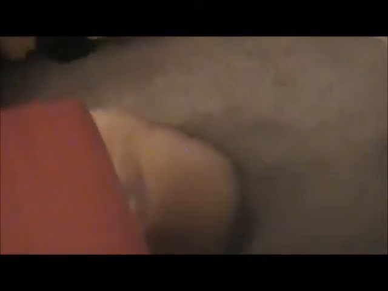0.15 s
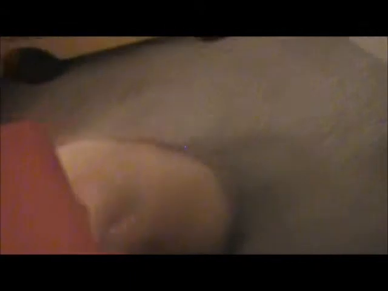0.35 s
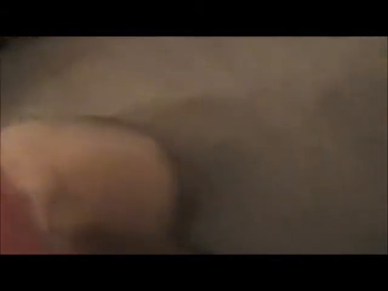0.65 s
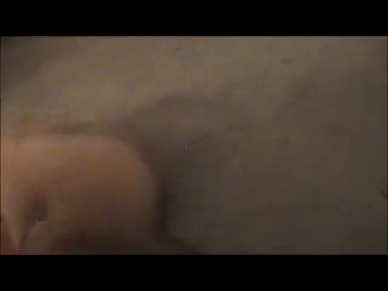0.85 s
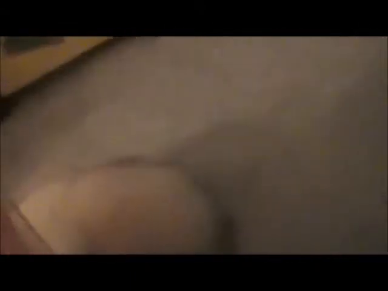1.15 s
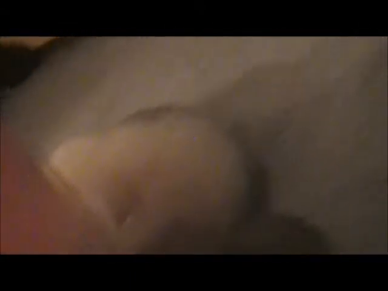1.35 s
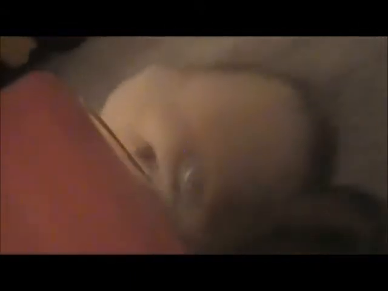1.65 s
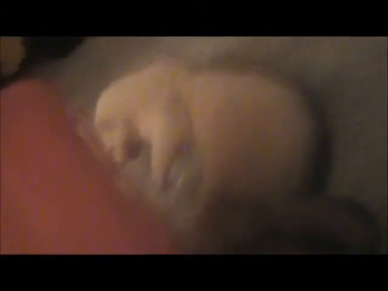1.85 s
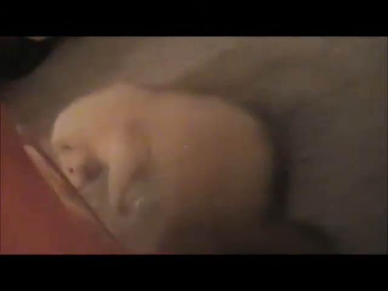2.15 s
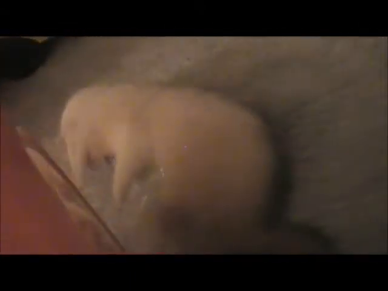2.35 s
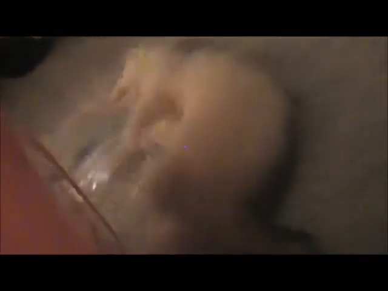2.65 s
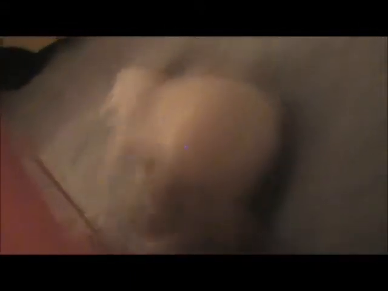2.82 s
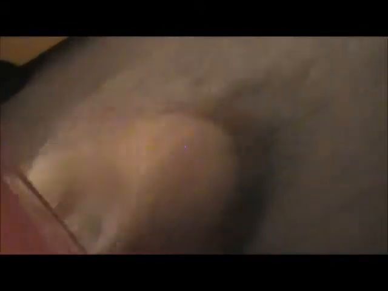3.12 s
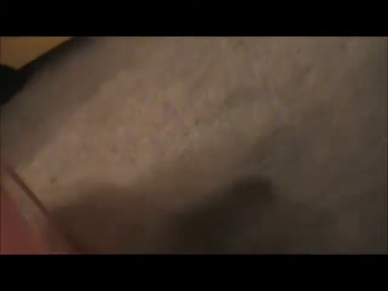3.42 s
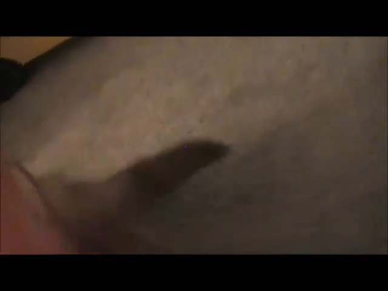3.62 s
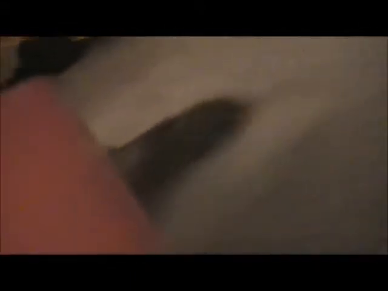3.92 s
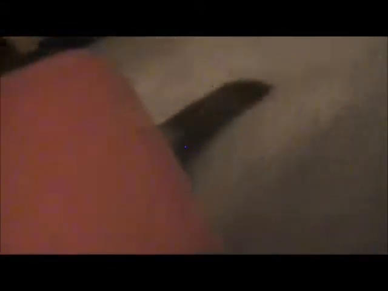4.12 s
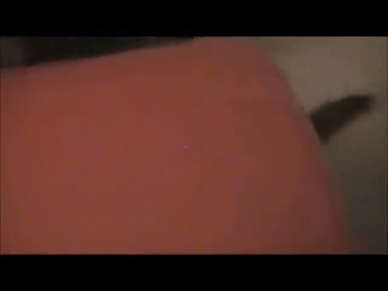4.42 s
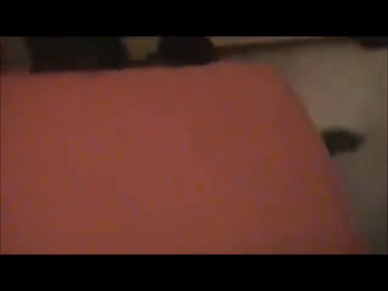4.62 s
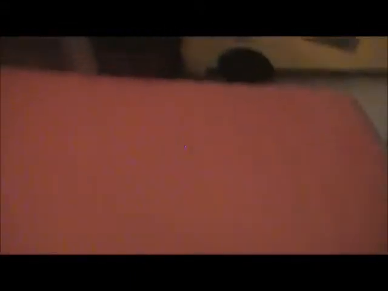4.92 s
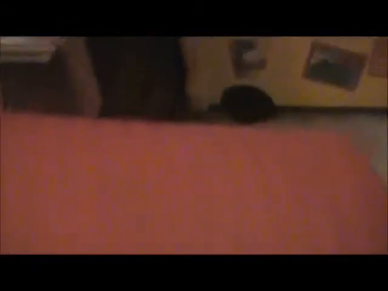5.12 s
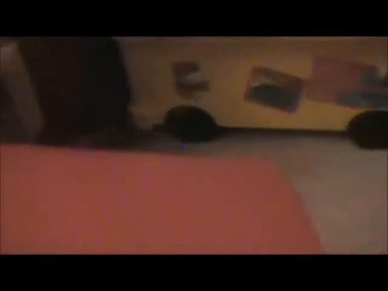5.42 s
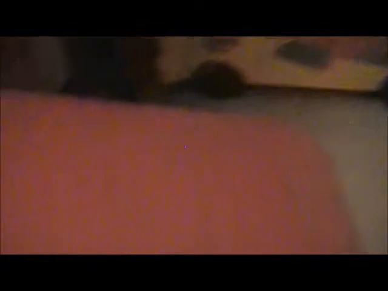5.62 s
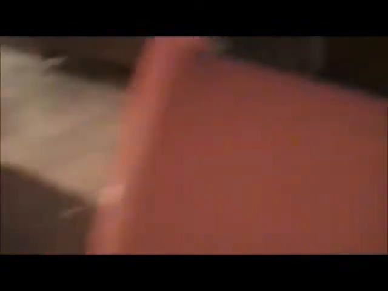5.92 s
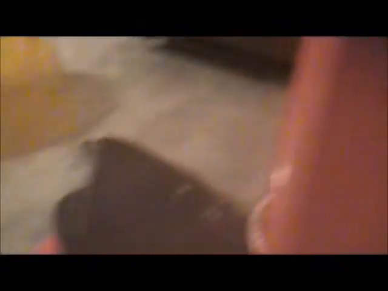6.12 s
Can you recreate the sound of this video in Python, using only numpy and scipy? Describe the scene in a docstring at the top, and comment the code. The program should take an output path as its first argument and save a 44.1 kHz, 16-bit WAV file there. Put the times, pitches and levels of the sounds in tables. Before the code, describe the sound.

Empty plastic bottles snap, crackle and knock against a plastic tub as a small ferret shoves them over carpet in a small room.

```python
"""A small carpeted room: a ferret shoves empty plastic bottles about, beside a plastic tub and close to a camera.
Noise bursts shaped by spectra make the thin walls snap, crumple and scrape and the bottles knock; decaying sines
ring the dented facets, struck panels and tub, and hoot as the air swings in a bottle's neck.
Shaped noise rubs fur and plastic on the carpet; a noise tail answers as the room, over a faint hum and hiss."""
import sys
import numpy as np
from scipy import signal
from scipy.fft import rfft, irfft, next_fast_len
from scipy.io import wavfile
from scipy.ndimage import uniform_filter1d

SR = 44100
rng = np.random.default_rng(int(sys.argv[2]) if len(sys.argv) > 2 else 0)


def store_wav(level_fs):
    """Save 16-bit WAV to argv[1]."""
    pcm = np.round(np.clip(np.atleast_2d(level_fs), -1, 1) * 32767)
    wavfile.write(sys.argv[1], SR, pcm.T.astype(np.int16))


N = 276543
TIME_S = np.arange(N) / SR


def amp(db):
    """Decibels to gain."""
    return 10 ** (np.asarray(db) / 20)


def unit(x):
    """Scales each channel to rms 1."""
    return x / np.sqrt(np.mean(x ** 2, axis=-1, keepdims=True) + 1e-20)


def read(points, hz):
    """Reads (f/Hz, value) points on a log-frequency axis."""
    f, value = np.transpose(points)
    return np.interp(np.log(hz + 1), np.log(f), value)


def add(mix, start_s, sound):
    """Mixes a sound in at start_s, cut off at the end of the mix."""
    part = mix[..., max(round(start_s * SR), 0):][..., :sound.shape[-1]]
    part += sound[..., :part.shape[-1]]


def response(points, size=2048):
    """The causal (minimum-phase) impulse response of a given spectrum."""
    log_gain = np.log(amp(read(points, abs(np.fft.fftfreq(size, 1 / SR)))))
    spectrum = np.exp(np.conj(signal.hilbert(log_gain)))
    return np.fft.ifft(spectrum).real[None, :size // 2]


def noise(points):
    """Mid and side noise of a given spectrum, rms 1."""
    size = next_fast_len(N)
    white = rfft(rng.standard_normal((2, size)))
    gain = amp(read(points, np.fft.rfftfreq(size, 1 / SR)))
    return unit(irfft(white * gain, size)[:, :N])


def waver(size, order):
    """Smooth random curve of rms 1 that changes over about order samples."""
    smooth = uniform_filter1d(rng.standard_normal(size), order)
    return unit(uniform_filter1d(smooth, order))


def radiate(force, responses, levels_db, length_s):
    """A force drives each range of the plastic; a range carries the energy of its level held for length_s."""
    parts = (amp(db) * unit(signal.fftconvolve(force, h, axes=1)) for h, db in zip(responses, levels_db))
    return sum(parts) * np.sqrt(length_s * SR / (force.shape[1] + responses[0].shape[1] - 1))


# radiation of a buckling wall, three ranges: f/Hz, relative level/dB
CRACK_SPECTRUM = [(3000, -49), (5000, -9.5), (6300, -3.5), (7900, 2.5), (9400, -0.5), (11000, -9),
                  (13500, -15.5), (16000, -23.5)]
FLEX_SPECTRUM = [(1000, -59.5), (1800, -13.5), (2300, 1), (2900, 0), (3700, 1.5), (5000, -5.5), (7000, -8),
                 (12000, -58.5)]
BODY_SPECTRUM = [(40, -10.5), (150, -10.5), (330, -10), (550, -6.5), (900, -3), (1600, -1), (2300, -17),
                 (5000, -32.5)]


def wall_responses():
    """The wall filters its force into a crack, a flex and a body range."""
    return [response(p) for p in (CRACK_SPECTRUM, FLEX_SPECTRUM, BODY_SPECTRUM)]


BODY_DB, BODY_DB_PER_FLEX_DB = -3.5, 1.14  # re crack at 0 dB of flex


def dent_levels(crack_db, flex_db):
    """Crack, flex and body levels: a bigger dent moves more of the bottle."""
    return crack_db + np.array([0, flex_db, BODY_DB + BODY_DB_PER_FLEX_DB * flex_db])


SNAP_RING_S, RING_DB_PER_FLEX_DB = 0.00404, 0.1  # a bigger dent rings longer
HARD_SNAP_DB, RING_DB_PER_EXCESS_DB = -20.5, 0.39  # a snap above this level is over sooner
# wall buckles: t/s, crack level/dB, dent size as flex level/dB re crack, facet f/Hz
WALL_SNAPS = [(0.0617, -17, -3.5, 2190), (0.0986, -19, -9, 4840), (0.1208, -9.5, -7.5, 2320),
              (0.3268, -35.5, 0.5, 2420), (0.4742, -32.5, -5.5, 1300), (0.5615, -11, -14, 4340),
              (0.68, -40.5, 12, 2550), (0.6992, -12, -4.5, 3750), (0.844, -11.5, -4.5, 2930),
              (0.897, -14.5, -9, 3200), (0.9383, -12, -9.5, 1300), (1.0308, -28.5, 4, 1250),
              (1.127, -33, -4, 900), (1.3546, -11, -12.5, 1040), (1.3665, -22, -1.5, 910),
              (1.516, -37.5, 1, 3560), (1.6351, -37.5, -2, 900), (2.389, -25.5, 0.5, 4070),
              (2.4205, -18.5, -4, 3200), (2.458, -23, -6, 4300), (2.541, -36, -6, 1510),
              (2.707, -29.5, -7, 790), (2.7358, -32, -7, 800), (2.756, -24, -14, 2600),
              (2.7626, -17.5, -7, 4800), (2.781, -15.5, -11.5, 4760), (2.818, -18, -12.5, 4800),
              (2.8215, -15.5, -12.5, 4830), (2.8561, -36, -3, 4860), (2.9718, -31, -8.5, 4800),
              (2.979, -32.5, -14, 4800), (3.679, -35.5, -1.5, 2830), (3.7911, -19.5, -8.5, 2300),
              (3.917, -16.5, -0.5, 2250), (4.2701, -19.5, -0.5, 3460), (4.293, -24.5, 0, 885),
              (4.3466, -19.5, -5.5, 3030), (4.398, -18, 1, 4520), (4.5347, -26.5, -3, 810),
              (4.8475, -29.5, 0, 1360), (4.9211, -17, -1, 3200), (5.027, -21.5, -5.5, 4530),
              (5.202, -23, 2.5, 1920), (5.247, -24.5, -6.5, 800), (5.2946, -29, 1, 980),
              (5.8628, -32, -6.5, 2150), (5.894, -33, -10, 1800), (5.9934, -31.5, -3.5, 2400),
              (6.0803, -22.5, -3, 900), (6.101, -23, 4.5, 1090), (6.2359, -25, -7, 2700)]


def snaps(rows, first=1.7, jump_s=0.00039, size=1200):
    """A dent pops through in a sharp jump, and the wave rattles round the thin wall for a few milliseconds."""
    out, t = np.zeros((2, N)), np.arange(size) / SR
    wall = wall_responses()
    for start_s, crack_db, flex_db, *_ in rows:
        excess_db = max(crack_db - HARD_SNAP_DB, 0)
        ring_s = SNAP_RING_S * amp(RING_DB_PER_FLEX_DB * flex_db - RING_DB_PER_EXCESS_DB * excess_db)
        rebound_s = ring_s * rng.uniform(0.48, 1)
        rebound = np.exp(-((t - rebound_s) / jump_s) ** 2)  # the rim of the dent follows
        force = rng.standard_normal((2, size)) * (np.exp(-t / ring_s) + 0.6 * rebound)
        force[0, 0] += first
        add(out, start_s, radiate(force, wall, dent_levels(crack_db, flex_db), 0.0018))
    return out


def facets(level_db=3.0, spread=0.043, t60_s=0.019, count=3):
    """Every dent leaves a facet of wall that rings briefly in a few close modes round its own pitch."""
    out, t = np.zeros((2, N)), np.arange(SR // 12) / SR
    for start_s, crack_db, flex_db, facet_hz in WALL_SNAPS:
        hz = facet_hz * (1 + spread * rng.uniform(-1.07, 1, (count, 1)))
        modes = np.sin(2 * np.pi * hz * t).sum(0) / count
        add(out[0], start_s, amp(level_db + crack_db + flex_db - 60 * t / t60_s) * modes)
    return out


TAUT_S = 0.121  # the hardest snap
# close modes of a taut wall: f/Hz, relative level/dB
TAUT_SPECTRUM = [(900, -46), (1500, -13), (2000, 3), (2400, 2.5), (2700, 0), (3200, -17), (4500, -39)]


def taut_wall(level_db=-23.5, t60_s=0.24):
    """The hardest snap leaves a taut wall singing on; fading band noise stands for its many close modes."""
    out, t = np.zeros((2, N)), np.arange(SR // 3) / SR
    add(out, TAUT_S, noise(TAUT_SPECTRUM)[:, :len(t)] * amp(level_db - 60 * t / t60_s))
    return out


# folds of a wall, and a few soft rustles and scrapes:
# middle t/s, half length/s, crack level/dB, flex level/dB re crack
WALL_CRUMPLES_AND_SCRAPES = [(0.005, 0.0057, -35.5, 3), (0.44, 0.097, -61, 5.5), (2.403, 0.014, -39, -6),
                             (2.565, 0.019, -44.5, -3), (2.783, 0.015, -31, -1), (2.821, 0.0073, -23, -8.5),
                             (3.603, 0.051, -50, 7), (3.934, 0.0093, -31.5, 0), (4.088, 0.064, -64.5, 13.5),
                             (4.438, 0.013, -44.5, 4.5), (4.971, 0.054, -38, 0), (5.22, 0.01, -34, 2),
                             (5.938, 0.012, -30.5, 1.5), (6.118, 0.011, -23.5, -6),
                             (6.247, 0.0098, -31.5, -2.5)]


def crumples(creases_per_s=1300):
    """A run of tiny random jolts over a weaker rustle, swelling and fading as the wall folds or scrapes."""
    out = np.zeros((2, N))
    wall = wall_responses()
    t = np.arange(-SR // 8, SR // 8) / SR
    for middle_s, half_s, crack_db, flex_db in WALL_CRUMPLES_AND_SCRAPES:
        creases = rng.random(len(t)) < creases_per_s / SR
        swell = np.exp(-.5 * (t / half_s) ** 2)
        force = rng.standard_normal((2, len(t))) * (creases + 0.21) * swell
        audible = force[:, middle_s + t >= 0]
        add(out, middle_s + t[0], radiate(audible, wall, dent_levels(crack_db, flex_db), 2 * half_s))
    return out


KNOCK_RING_S, RING_DB_PER_HARDNESS_DB = 0.0072, 0.07  # a hard contact is shorter
CLACK_DB, CLACK_DB_PER_HARDNESS_DB = -3, 1.31
# radiation of a knock, three ranges: f/Hz, relative level/dB
THUD_SPECTRUM = [(40, -54), (130, -7), (260, 2.5), (400, -2.5), (560, 1), (800, -18.5), (2000, -34.5)]
HOLLOW_SPECTRUM = [(300, -33.5), (600, -2), (780, -1), (1150, -7), (1600, -11.5), (4000, -50)]
CLACK_SPECTRUM = [(700, -60.5), (1300, -8), (1600, 5.5), (2200, 0), (3200, -18), (5000, -29), (10000, -33),
                  (16000, -72)]
# a bottle bumps the tub or the floor: t/s, base level/dB, hardness/dB, struck panel f/Hz
BOTTLE_KNOCKS = [(0.061, -27.5, -2.5, 574), (0.446, -34, -4, 416), (0.545, -36, 2, 450),
                 (0.68, -40.5, 13.5, 810), (0.893, -29, -1.5, 545), (0.933, -52.5, 22.5, 795),
                 (1.182, -31, -7.5, 465), (1.267, -33, -33, 483), (1.283, -37, -19, 490),
                 (1.306, -39, -17, 490), (1.5955, -37.5, 5, 926), (2.571, -37, 3.5, 282),
                 (2.702, -32.5, -4, 780), (2.738, -29.5, -17, 410), (2.779, -24.5, -38, 308),
                 (2.926, -40.5, -29, 363), (3.486, -36, -18, 302), (3.522, -33.5, 5, 882),
                 (3.546, -30.5, -6, 930), (3.785, -29.5, -3, 724), (3.863, -34, -7.5, 575),
                 (3.92, -30, -23, 276), (4.295, -28.5, -7.5, 845), (4.621, -23, -11, 375),
                 (4.632, -26.5, -3.5, 360), (4.745, -25, 0.5, 687), (4.762, -29, -15, 646),
                 (4.92, -28, -0.5, 290), (4.963, -22, 1.5, 826), (4.968, -27, 4, 297),
                 (5.062, -22.5, -5.5, 425), (5.295, -13, -8.5, 382), (5.314, -18.5, -28, 398),
                 (5.368, -25, -5.5, 424), (5.431, -36, 0.5, 850), (5.686, -26.5, -5, 422),
                 (5.704, -29.5, -11, 397), (6.113, -16.5, -5.5, 354)]


def knocks(level_db=-1.0, thud_db=-3, blow=3.1, size=2400):
    """A blunt blow and a short shudder of the damped plastic; the harder the contact, the more it clacks."""
    out, t = np.zeros((2, N)), np.arange(size) / SR
    shell = [response(p) for p in (THUD_SPECTRUM, HOLLOW_SPECTRUM, CLACK_SPECTRUM)]
    for start_s, base_db, hardness_db, _ in BOTTLE_KNOCKS:
        ring_s = KNOCK_RING_S * amp(-RING_DB_PER_HARDNESS_DB * hardness_db)
        force = rng.standard_normal((2, size)) * np.exp(-t / ring_s)
        force[0, 0] += blow
        clack_db = CLACK_DB + CLACK_DB_PER_HARDNESS_DB * hardness_db
        levels_db = level_db + base_db + np.array([thud_db, hardness_db, clack_db])
        add(out, start_s, radiate(force, shell, levels_db, 0.0052))
    return out


PANEL_DB_PER_HARDNESS_DB = 0.81  # a hard contact rings the panel more
# tub modes after every knock: f/Hz, relative level/dB, t60/s
TUB_RING = [(339.3, -9, 0.23), (462, -28, 0.32), (515, -8, 0.23), (832, -23.5, 0.17), (1100, -31, 0.11)]


def panels(panel_db=1, tub_db=-4, rise_s=0.0008, panel_t60_s=0.055):
    """Each knock gives a few round cycles of the struck panel, and the tub's modes ring a little longer."""
    out, t = np.zeros(N), np.arange(SR // 4) / SR
    for start_s, base_db, hardness_db, panel_hz in BOTTLE_KNOCKS:
        struck_db = panel_db + PANEL_DB_PER_HARDNESS_DB * max(hardness_db, 0)
        modes = [(panel_hz, struck_db, panel_t60_s)]
        modes += [(hz, tub_db + db, t60_s) for hz, db, t60_s in TUB_RING]
        for hz, mode_db, t60_s in modes:
            swing = np.sin(2 * np.pi * (hz * t + rng.random())) * (1 - np.exp(-t / rise_s))
            add(out, start_s, amp(base_db + mode_db - 60 * t / t60_s) * swing)
    return out


NECK_HZ, NECK_SCATTER = 222.7, 0.043  # pitch and its relative spread as the bottle is dented
SNAP_HOOT_DB, KNOCK_HOOT_DB = -17, -9.5  # re the snap's flex; re the knock's base level
# the ferret leans on a bottle: t/s, level/dB, neck f/Hz
BOTTLE_SQUEEZES = [(0.0, -23, 214), (0.124, -27, 222), (0.279, -36.5, 235), (0.897, -32, 202),
                   (1.597, -30.5, 219.4), (2.414, -27.5, 228), (2.575, -36, 219), (2.777, -22, 216),
                   (3.642, -27.5, 210), (3.784, -32, 215), (3.912, -29.5, 202.5), (4.272, -31, 216),
                   (4.437, -27.5, 213), (4.536, -28, 198), (4.853, -24.5, 213), (4.921, -16.5, 214),
                   (4.966, -16, 223), (5.235, -19.5, 219), (5.296, -5.5, 214.2), (5.441, -29.5, 212),
                   (5.866, -34, 214), (5.929, -34.5, 214), (6.111, -19.5, 213.5)]


def pushes():
    """Everything that moves the air in a bottle: the squeezes, and a small hoot from each snap and knock."""
    jolts = [(s, db + flex_db + SNAP_HOOT_DB) for s, db, flex_db, _ in WALL_SNAPS]
    jolts += [(s, db + KNOCK_HOOT_DB) for s, db, _, _ in BOTTLE_KNOCKS]
    scattered = [(s, db, NECK_HZ * (1 + NECK_SCATTER * rng.standard_normal())) for s, db in jolts]
    return list(BOTTLE_SQUEEZES) + scattered


def hoots(push_s=0.03, t60_s=0.13, rise_s=0.0018, sag_db_per_s=100, bend=0.24, settle_s=0.0047, wobble=0.007):
    """The neck's air resonance swings while the wall is pushed, settles unsteadily in pitch, then dies quickly."""
    out, t = np.zeros(N), np.arange(SR // 4) / SR
    fade_db = sag_db_per_s * t + 60 * np.maximum(t - push_s, 0) / t60_s
    for start_s, db, hz in pushes():
        pitch_hz = hz * (1 + bend * np.exp(-t / settle_s) + wobble * waver(len(t), order=200))
        turns = np.cumsum(pitch_hz) / SR
        add(out, start_s, amp(db - fade_db) * (1 - np.exp(-t / rise_s)) * np.sin(2 * np.pi * turns))
    return out


# the heavier shoves rock the tub on the floor: t/s, base level/dB
TUB_BUMPS = [(3.524, -29.5), (4.96, -22), (5.062, -24), (5.17, -25), (5.3, -22), (5.688, -28),
             (6.11, -23.5)]


def bumps(hz=130, rise_s=0.011, t60_s=0.078):
    """A few soft low cycles, damped by the carpet."""
    out, t = np.zeros(N), np.arange(SR // 5) / SR
    swing = 2 * (1 - np.exp(-t / rise_s)) * np.sin(2 * np.pi * hz * t)
    for start_s, db in TUB_BUMPS:
        add(out, start_s, amp(db - 60 * t / t60_s) * swing)
    return out


def plastic():
    """The snaps, facets, crumples, scrapes and knocks as they leave the bottles in one direction."""
    return snaps(WALL_SNAPS) + facets() + crumples() + knocks()


# spectra: f/Hz, relative level/dB per Hz
SCUFF_SPECTRUM = [(35, -17), (70, 0), (150, 6), (230, 9), (400, 6), (800, 1.5), (1500, -0.5), (2800, -8),
                  (5000, -12.5), (10000, -47)]
SWISH_SPECTRUM = [(1000, -19), (2500, 1), (4000, 0), (5800, 0), (8200, 3.5), (10500, -3.5), (13000, -12),
                  (16000, -18)]
# fur and plastic slide on the carpet: t/s, scuff base level/dB, swish base level/dB
SLIDES = [(0.0, -36.5, -37.5), (0.24, -50, -50), (0.87, -53.5, -55), (1.13, -58.5, -65), (1.33, -53.5, -62),
          (1.61, -53, -51.5), (2.13, -56.5, -64), (2.43, -57, -72), (2.57, -47.5, -50), (2.72, -53.5, -51),
          (3.04, -57, -62), (3.42, -53, -58), (3.75, -48.5, -58), (4.26, -42, -51), (4.42, -43, -45),
          (4.85, -41, -47), (5.73, -43.5, -47), (6.27, -39, -43.5)]


def rubbing(scuff_db=-1, swish_db=-2, scuff_catch_db=1.34, swish_catch_db=-0.4):
    """Sliding friction: the plastic drags unevenly, while fur and carpet fibres swish more smoothly."""
    t, scuff, swish = np.transpose(SLIDES)
    catch = waver(N, order=400)
    low = noise(SCUFF_SPECTRUM) * amp(scuff_db + np.interp(TIME_S, t, scuff) + scuff_catch_db * catch)
    high = noise(SWISH_SPECTRUM) * amp(swish_db + np.interp(TIME_S, t, swish) + swish_catch_db * catch)
    return low + high


def ticks(per_s=4.7, level_db=3.5, spread_db=10, flex_db=-7.5, count=60):
    """Rows for faint snaps at random moments, stronger where the sliding swishes louder."""
    wait, strength = rng.random((count, 2)).T
    times_s = np.cumsum(-np.log(1 - wait)) / per_s
    t, _, swish = np.transpose(SLIDES)
    levels_db = np.interp(times_s, t, swish) + level_db + spread_db * (2 * strength - 1)
    return [(s, db, flex_db) for s, db in zip(times_s, levels_db) if s < N / SR]


# reverberation: f/Hz, t60/s
ROOM_DECAY = [(200, 0.26), (550, 0.14), (1400, 0.19), (3700, 0.18), (8000, 0.2), (14000, 0.16)]
# reverberation: f/Hz, band level/dB
ROOM_BANDS = [(100, -17.5), (400, 2), (1400, -6), (3700, -5.5), (8000, -10.5), (14000, -8)]


def room(x, gap_s=0.0046, build_s=0.00033, side_db=3):
    """Dense reflections arrive a few milliseconds late; each band dies at its own speed."""
    taps = rng.standard_normal((2, SR // 2))
    hz, t, z = signal.stft(taps, SR, nperseg=256)
    t60_s = read(ROOM_DECAY, hz)[:, None]
    fade_db = read(ROOM_BANDS, hz)[:, None] - 60 * t / t60_s
    z = z * amp(fade_db) * np.sqrt(2 * np.log(1000) / (t60_s * SR))  # equal energy whatever the t60
    tail = signal.istft(z, SR, nperseg=256)[1]
    tail *= 1 - np.exp(-np.arange(tail.shape[1]) / SR / build_s)
    tail = np.pad(tail, ((0, 0), (round(gap_s * SR), 0)))
    return signal.fftconvolve(x[:1], tail, axes=1)[:, :N] * amp([[0], [side_db]])


def reflections(count=3):
    """A crinkled wall sends a different waveform in each direction, so the room's tail is dense and unpitched."""
    return sum(room(plastic()) for _ in range(count)) / np.sqrt(count)


# steady tones: f/Hz, rms level/dB
HUM_TONES = [(119.5, -60.5), (273.5, -66), (506, -75.5), (1096, -70)]
# f/Hz, relative level/dB per Hz
HISS_SPECTRUM = [(25, -3), (50, -2), (90, -20), (170, -12), (300, -3.5), (500, -30.5), (750, -20.5),
                 (1100, -9), (1600, -15), (3600, -19.5), (5500, -28), (8000, -31.5), (15500, -40)]


def background(hiss_db=-61.5):
    """A faint mains hum of steady sines over a steady noise hiss."""
    out = amp(hiss_db) * noise(HISS_SPECTRUM)
    for hz, db in HUM_TONES:
        out[0] += np.sqrt(2) * amp(db) * np.sin(2 * np.pi * (hz * TIME_S + rng.random()))
    return out


def ports(x, width):
    """Mid and side to left and right, as at two close microphone ports; the side is filtered by width."""
    side = signal.oaconvolve(x[1], response(width)[0])[:N]
    return np.array([x[0] + side, x[0] - side])


# stereo width: f/Hz, side gain/dB
BOTTLE_WIDTH = [(60, -6.5), (110, -10), (200, -15), (380, -18), (700, -14), (1290, -13), (2380, -12),
                (4400, -9), (8120, -6), (15000, 0)]
RUB_HISS_WIDTH = [(60, 4), (110, -0.5), (200, -3.5), (380, -1.5), (700, 0), (1290, -1.5), (2380, -2),
                  (4400, -4.5), (8120, -4.5), (15000, 1)]


def scene(low_lean_db=0.87):
    """The bottles and their room, over rubbing, hum and hiss; the lows lean to the right."""
    direct = plastic() * amp([[0], [-3]])  # mid, side
    bottles = direct + reflections() + taut_wall()
    lows = (hoots() + bumps() + panels()) * amp([[-low_lean_db], [low_lean_db]])
    bed = ports(rubbing() + background(), RUB_HISS_WIDTH)
    return ports(bottles + snaps(ticks()), BOTTLE_WIDTH) + lows + bed


def record(dry, lag=0.51, max_step=0.38, edge_hz=16000):
    """Steps too steep for the input pull it down, adding a low bump; then clipping and the band limits."""
    excess = np.maximum(abs(np.diff(dry, prepend=0)) - max_step, 0)
    clipped = np.clip(dry - lag * excess, -0.9, 0.9)
    high_passed = signal.sosfilt(signal.butter(1, 30, "high", fs=SR, output="sos"), clipped)
    low_pass = signal.firwin(301, edge_hz, window=("kaiser", 8), fs=SR)
    return signal.oaconvolve(high_passed, low_pass[None], "same")


dry = scene()
out = record(dry)
store_wav(out)
```